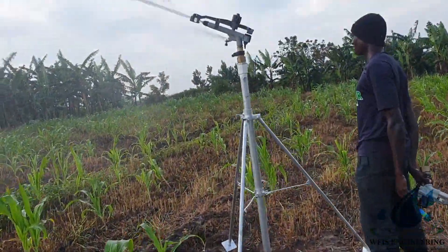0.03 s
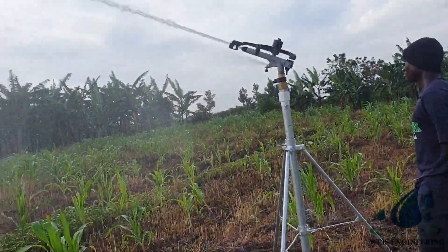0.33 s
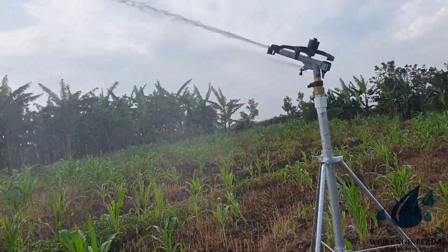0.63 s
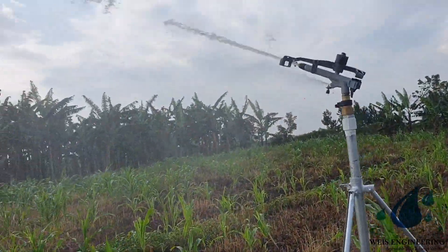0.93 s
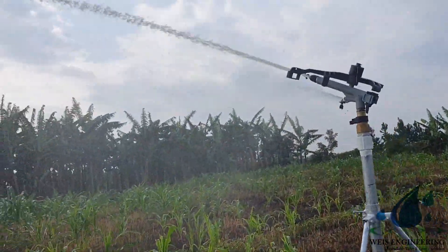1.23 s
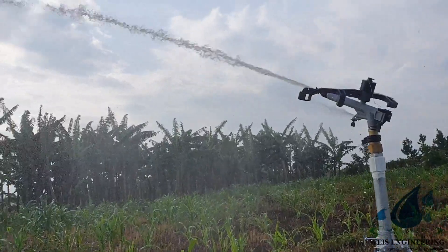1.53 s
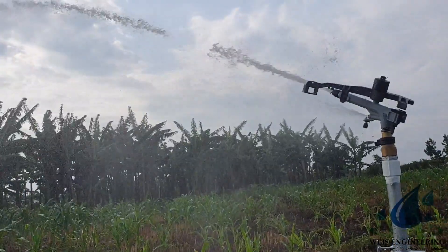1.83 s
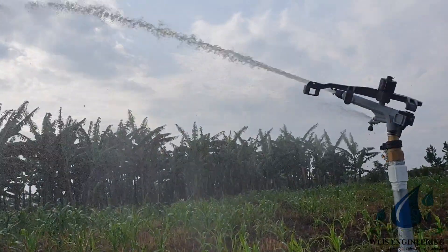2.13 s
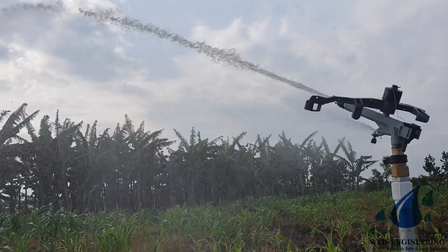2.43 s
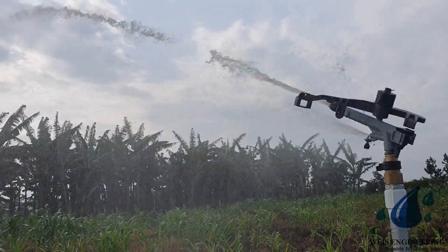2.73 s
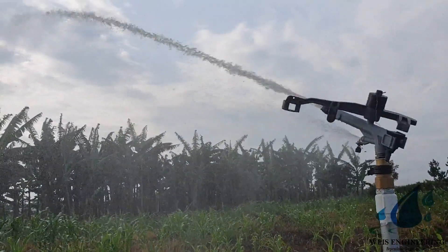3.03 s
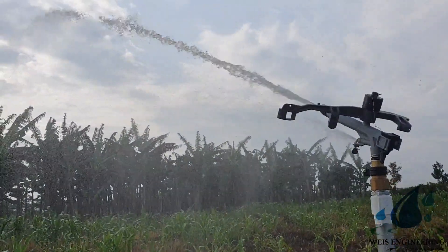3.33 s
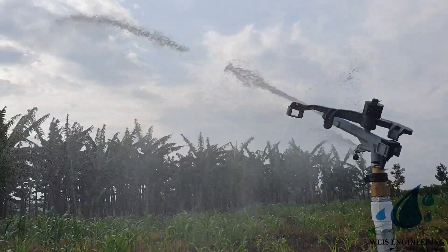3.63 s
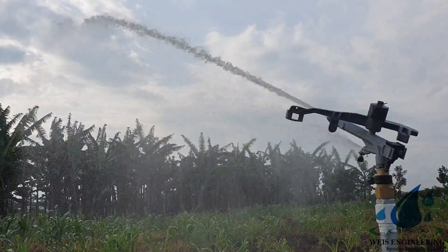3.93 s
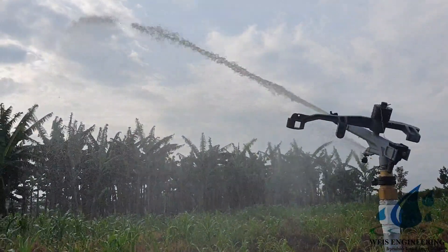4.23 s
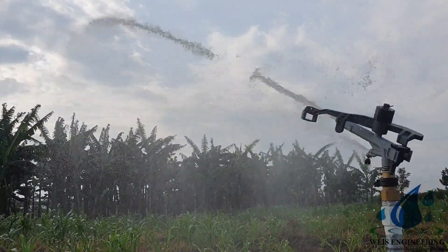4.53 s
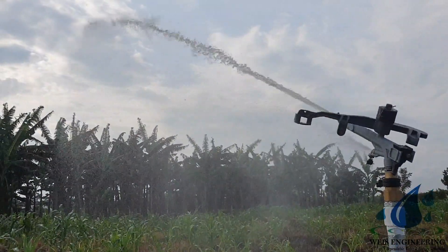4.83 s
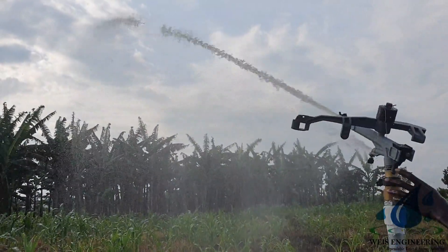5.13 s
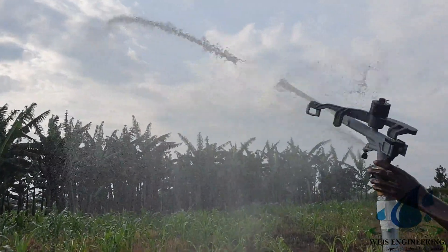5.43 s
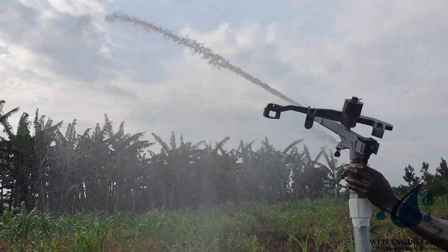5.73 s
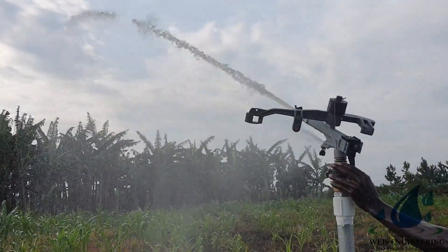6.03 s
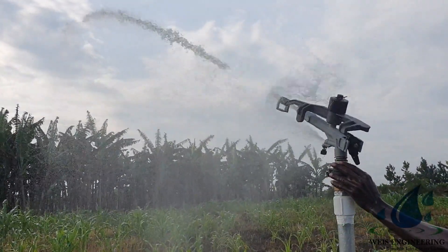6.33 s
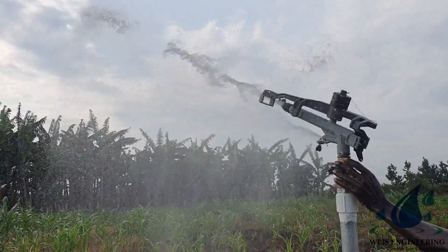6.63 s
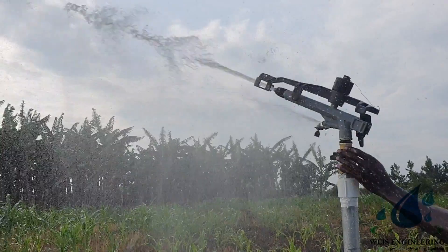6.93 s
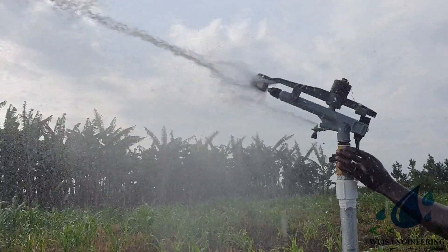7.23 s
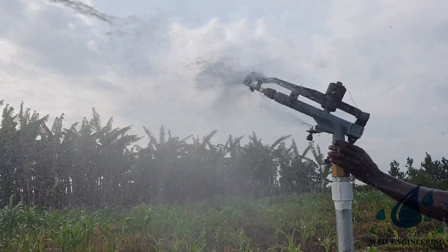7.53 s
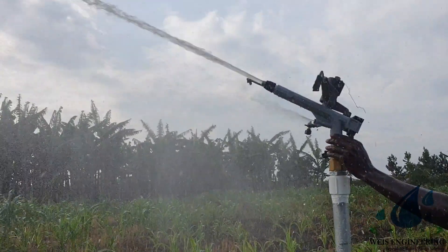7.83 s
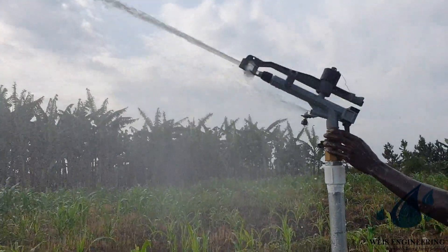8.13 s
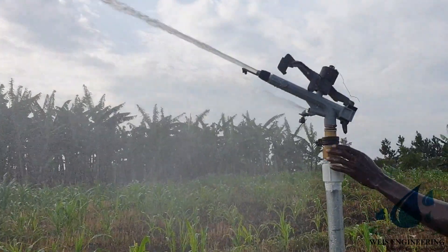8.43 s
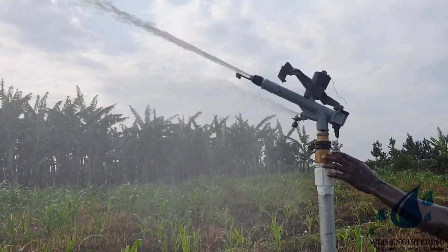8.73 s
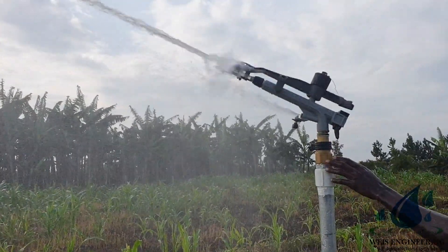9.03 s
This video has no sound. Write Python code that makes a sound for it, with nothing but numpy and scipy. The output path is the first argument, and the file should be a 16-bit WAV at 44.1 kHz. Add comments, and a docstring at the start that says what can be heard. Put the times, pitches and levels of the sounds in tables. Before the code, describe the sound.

An impact sprinkler hisses and splashes rhythmically outdoors, then breaks into rapid clacking strokes as drops tap near the microphone.

```python
"""An impact sprinkler waters a field: its jet hisses, and about twice a second the spoon of the
swinging arm cuts the water with a short splash. For about a second the head swings back in rapid
strokes; each blow on the stop excites the arm's damped modes, and flung drops tap on a hand-held
camera nearby. Eddies of a light wind flutter at the microphone ports, buffets or a knock give dull
low thumps, and the holder's fingers rub on the case and creak by stick-slip friction."""
import sys
import numpy as np
from scipy import signal
from scipy.fft import rfft, irfft
from scipy.io import wavfile

SR = 44100
rng = np.random.default_rng(int(sys.argv[2]) if len(sys.argv) > 2 else 0)


def persist_wave(psi):
    """Save psi, clipped to +-1, as 16-bit WAV."""
    counts = np.round(np.clip(psi, -1, 1) * 32767).astype(np.int16)
    wavfile.write(sys.argv[1], SR, np.atleast_2d(counts).T)


N = 399987
TIME = np.arange(N) / SR

# Strength of the breeze. Each row: time in seconds, relative level in dB.
BREEZE_LEVELS = [(0.0, -39.5), (0.92, -40.5), (1.54, -31.5), (2.31, -40.1), (3.07, -43.5), (3.23, -35.7),
                 (4.61, -53.5), (5.07, -40.5), (6.3, -50.5), (7.38, -40.5), (8.15, -42.5), (8.3, -38),
                 (9.07, -45.5)]
# Gusts. Each row: start of the hold in seconds, hold in seconds, level in dB, left over right in dB.
GUST_EVENTS = [(1.14, 0.85, -36.5, 2), (1.499, 0.055, -30.5, -12), (1.762, 0.03, -31.5, -15),
               (3.24, 0.26, -39, -2), (5.066, 0.089, -43, -8), (7.947, 0.78, -42, -3)]
# Spectra of the wind's rumble and of its eddies. Each row: frequency in Hz, gain in dB.
RUMBLE_SPECTRUM = [(20, -43), (32, -15.5), (45, 2.5), (60, 9), (85, -3), (130, -10), (250, -19), (600, -70)]
EDDY_SPECTRUM = [(18, -51), (32, -3.5), (55, 4), (100, 4), (170, -5), (280, -14.5), (500, -35), (1200, -60)]
# Dull low thumps. Each row: start in seconds, level in dB, final pitch in Hz, left over right in dB.
LOW_THUMPS = [(0.376, -37, 49, -22), (1.181, -31.5, 93, -18.5), (3.311, -39.5, 63.6, -26),
              (5.8152, -16, 50.3, 14), (8.027, -33.5, 57, 22)]
# Shifts of the grip. Each row: centre in seconds, level in dB, half length in seconds.
GRIP_SHIFTS = [(0.167, -46, 0.01), (1.191, -42, 0.0074), (3.548, -43, 0.01), (3.723, -44, .01),
               (7.765, -34.5, 0.017), (8.344, -38, .04)]
# Finger drags. Each row: first slip in seconds, release in seconds, relative level in dB.
FINGER_DRAGS = [(2.757, 2.766, -4), (2.821, 2.839, -6)]
# Spectra of skin rubbing and scraping. Each row: frequency in Hz, gain in dB.
RUB_SPECTRUM = [(100, -13), (300, 9), (700, -5.5), (1500, -6), (5000, -45)]
SCRAPE_SPECTRUM = [(2500, 10.5), (5000, 2), (8500, -13), (10500, 4), (13000, -8), (14600, -3), (15150, 15),
                   (15900, -8)]
# Modes of the case and of the wet arm. Each row: frequency in Hz, level in dB, 60 dB decay in seconds.
CASE_MODES = [(161.2, -2.5, 0.23), (309, -2.5, 0.028), (573, -17.5, 0.11), (860, -28, 0.022),
              (1050, -35, 0.015)]
ARM_MODES = [(640, -3.5, 0.038), (810, -1, 0.021), (1054, -1, 0.027), (1600, -10, .008), (2550, -5, 0.033),
             (3580, 3.5, 0.0067), (4700, -4, 0.0041)]
# Large drops on the camera. Each row: start in seconds, level in dB, pitch in Hz.
LARGE_DROPS = [(2.1640, -2.5, 1480), (6.7199, 0.5, 1650), (6.7400, -2.5, 750), (6.7746, -11, 990),
               (6.858, -4.5, 980), (7.0122, -3, 1860), (7.0300, -8.5, 1310), (7.045, -8, 1040),
               (7.1592, -2, 1670), (7.3036, -7, 1550), (7.3951, -5.5, 1780), (7.678, -3.5, 1510),
               (7.698, -6.5, 1500), (7.9484, -10, 1250), (8.3967, -17.5, 1890)]
# Response of the ports to airborne sound. Each row: frequency in Hz, left gain in dB, right gain in dB.
PORT_RESPONSE = [(290, -4, -5.5), (670, -7, -1.5), (840, -7, -4.5), (1020, -4, -0.5), (1540, 0, -9),
                 (1920, 0, -6.5), (2530, -9, -10.5), (3410, -9, -5), (3900, -16, -6), (5880, -16, -5),
                 (7640, -28.5, -21.5), (8300, -30, -22.5), (10500, -19.5, -8), (14300, -38, -12.5),
                 (16000, -36, -17.5)]
# Likeness of noise at the two ports. Each row: frequency in Hz, correlation coefficient.
PORT_COHERENCE = [(60, 0.57), (200, 0.95), (650, 0.92), (1400, 0.39), (2800, 0.026)]
# The reversing latch trips in and out. Each row: start in seconds, relative level in dB.
LATCH_TRIPS = [(6.354, -9.5), (7.688, -4.5)]
# Strength of the jet's hiss. Each row: time in seconds, relative level in dB.
JET_LEVELS = [(0.0, -49), (2.5, -47), (3.13, -51), (5.25, -51), (5.61, -47.5), (6.34, -48), (6.52, -42.5),
              (6.8, -43), (8.01, -45.5), (9.07, -47)]
# The spoon cuts the jet. Each row: start in seconds, relative level in dB.
SPOON_DIPS = [(-.016, -19), (0.437, -20), (.882, -17.5), (1.334, -18), (1.785, -16), (2.239, -17),
              (2.686, -14.5), (3.141, -20), (3.593, -21), (4.046, -21.5), (4.496, -21), (4.956, -21.5),
              (5.408, -17), (5.861, -15.5), (6.322, -17), (6.444, -20), (6.572, -18), (6.704, -17.5),
              (6.842, -19.5), (6.974, -21), (7.112, -19.5), (7.248, -19), (7.387, -17), (7.526, -18.5),
              (7.666, -17), (8.15, -17), (8.591, -18), (9.047, -16.5)]
# Spectra of the clacks, the jet and the splashes. Each row: frequency in Hz, gain in dB.
CLACK_SPECTRUM = [(60, -25), (400, -8.5), (900, 0), (3500, 5.5), (6000, 3.5), (11000, 1), (16000, -4)]
JET_SPECTRUM = [(30, 11.5), (60, 2.5), (100, 4.5), (200, 4), (400, -1), (800, 0.5), (1600, 1), (2600, -4),
                (4200, -7), (7000, -7), (11000, -5.5), (16000, -0.5)]
SPLASH_SPECTRUM = [(40, -17.5), (130, 8.5), (430, -3.5), (620, 3), (850, 0.5), (1080, 3.5), (1500, 2),
                   (3000, 1), (6000, -0.5), (11000, 1), (16000, 4)]

RETURN_FROM_S, RETURN_TO_S = 6.3, 7.6  # the head swings back
SHOWER_FROM_S, SHOWER_TO_S = 6.55, 7.7  # flung water sweeps over the camera
DIP_S, RETURN_DIP_S = 0.022, 0.026  # the spoon's time in the jet, going forward and back
CLACK_LAG_S, CLACK_DB = 0.048, -12.5  # on the return the arm hits its stop after each dip
BOUNCE_S, BOUNCE_DB = 0.011, -7.5  # it rebounds and lands again, softer
GUST_RISE_S, GUST_FALL_S = 0.054, 0.086


def amp(db):
    """Amplitude grows tenfold for every 20 dB."""
    return 10 ** (np.asarray(db) / 20)


def unit(x):
    """Normalisation to an rms of 1."""
    return x / np.sqrt(np.mean(x ** 2) + 1e-20)


def spectrum_at(points, hz, column=1):
    """Interpolation of a spectrum on a logarithmic frequency axis."""
    table = np.array(points, float)
    return np.interp(np.log(hz + 1), np.log(table[:, 0] + 1), table[:, column])


def level_curve(rows):
    """Linear interpolation of a level at every sample."""
    table = np.array(rows, float)
    return np.interp(TIME, table[:, 0], table[:, 1])


def add(mix, s, sound):
    """Superposition: a sound joins the mix at s seconds."""
    part = mix[..., max(round(s * SR), 0):][..., :sound.shape[-1]]
    part += sound[..., :part.shape[-1]]


def sides(balance_db):
    """A level difference places a sound: left and right gains."""
    return amp(np.vstack([balance_db / 2, -balance_db / 2]))


def colour(x, points, column=1, size=4096):
    """Minimum-phase filtering: the phase is the Hilbert transform of the log gain."""
    log_gain = np.log(amp(spectrum_at(points, abs(np.fft.fftfreq(size, 1 / SR)), column)))
    taps = np.fft.ifft(np.exp(np.conj(signal.hilbert(log_gain)))).real
    return signal.oaconvolve(np.atleast_2d(x), taps[None], axes=1)[:, :N]


def split(x, edge_hz):
    """Complementary filters give the parts below and above a frequency."""
    hz = np.fft.rfftfreq(N, 1 / SR)
    low = irfft(rfft(x) / (1 + (hz / edge_hz) ** 4), N)
    return low, x - low


def wander(rate_hz):
    """Low-passed noise fluctuates smoothly, with an rms of 1."""
    slow, _ = split(rng.standard_normal(N), rate_hz)
    return unit(slow)


def port_noise():
    """Partial coherence: noise at two ports is alike in the bass, unrelated in the treble."""
    shared, separate = rfft(rng.standard_normal((2, N)))
    likeness = spectrum_at(PORT_COHERENCE, np.fft.rfftfreq(N, 1 / SR))
    return irfft(np.array([shared, likeness * shared + np.sqrt(1 - likeness ** 2) * separate]), N)


def returning(s):
    """True while the head swings back."""
    return RETURN_FROM_S < s < RETURN_TO_S


def wind(rumble_db=-3.5, calm_db=-12, lumps_db=3, puffs_db=3.6):
    """Turbulent pressure rumbles and flutters at the ports; breeze and gusts add in power."""
    breeze_db = level_curve(BREEZE_LEVELS)
    rumble = unit(colour(port_noise(), RUMBLE_SPECTRUM)) * amp(breeze_db + rumble_db)
    power = amp(breeze_db + calm_db) ** 2
    for s, hold, db, balance_db in GUST_EVENTS:
        before, after = np.maximum(s - TIME, 0), np.maximum(TIME - s - hold, 0)
        swell = np.exp(-before / GUST_RISE_S - after / GUST_FALL_S)
        power = power + (amp(db) * swell * sides(balance_db)) ** 2
    eddies = rng.standard_normal((2, N))
    eddies *= amp(puffs_db * wander(11.3) + lumps_db * np.array([wander(29), wander(25)]))
    return rumble + unit(colour(eddies, EDDY_SPECTRUM)) * np.sqrt(power)


def thumps(t60=0.11, sag=3.63, sag_s=0.00425):
    """Damped oscillations of falling pitch, from wind buffeting the ports or a knock on the camera."""
    t, out = np.arange(SR // 5) / SR, np.zeros((2, N))
    for s, db, hz, balance_db in LOW_THUMPS:
        turns = np.cumsum(hz * (1 + sag * np.exp(-t / sag_s))) / SR
        add(out, s, sides(balance_db) * amp(db - 60 * t / t60) * np.sin(2 * np.pi * turns))
    return out


def rubs(balance_db=6, catch_db=3):
    """Sliding friction near the left port makes uneven noise that follows the hand's pressure."""
    pressure = sum(amp(db) * np.exp(-((TIME - s) / length) ** 2) for s, db, length in GRIP_SHIFTS)
    friction = rng.standard_normal((2, N)) * amp(catch_db * wander(110))
    return unit(colour(friction, RUB_SPECTRUM)) * pressure * sides(balance_db)


def tap(hz, crest=0.33, push_db=-11, push_ratio=0.42, push_crest=0.28,
        tick_db=-26, tick_turns=0.04, recoil_hz=230):
    """An impact transient of peak 1: a tick, a brief wave and a slower push; the wall springs back."""
    def pulse(cycles, top):
        return cycles / top * np.exp(1 - cycles / top)

    turns = hz * np.arange(SR // 40) / SR
    push_turns = turns * push_ratio
    wave = pulse(turns, crest) * np.sin(2 * np.pi * turns)
    push = amp(push_db) * pulse(push_turns, push_crest) * np.sin(2 * np.pi * push_turns)
    tick = amp(tick_db) * pulse(turns, tick_turns)
    impact = signal.lfilter(*signal.butter(2, recoil_hz, "highpass", fs=SR), wave + push + tick)
    return impact / abs(impact).max()


def creaks(slip_hz=232, slip_db=-4, growth_db=4.5, held_t60=0.026,
           snap_db=-5, snap_hz=900, scrape_db=-23, balance_db=17):
    """Stick-slip: skin jerks ever harder on the case it damps; on release the modes ring freely."""
    t, out, scrape = np.arange(SR // 3) / SR, np.zeros(N), np.zeros(N)
    ring = -sum(amp(db - 60 * t / t60) * np.sin(2 * np.pi * hz * t) for hz, db, t60 in CASE_MODES)
    damping = amp(-60 * t / held_t60)
    slip = ring * damping
    add(slip, 0, -amp(snap_db) * tap(snap_hz))
    for start, release, db in FINGER_DRAGS:
        for s in np.arange(start, release, 1 / slip_hz):
            force = amp(db + slip_db - growth_db * (release - s) * slip_hz)
            add(out, s, force * slip)
            add(scrape, s, force * damping)
        add(out, release, amp(db) * ring)
    out += amp(scrape_db) * colour(scrape * rng.standard_normal(N), SCRAPE_SPECTRUM)[0]
    return np.array([out, amp(-balance_db) * out])


def drops(right_db=-12, right_crest=0.3, flung_db=-20, flung_count=3, flight_s=0.061, scatter_s=0.016,
          shower_db=-30, shower_per_s=60, stray_per_s=1.5, stray_db=-39, pitch_hz=1450, spread_db=3):
    """Drop impacts near the left port: large ones, flung clusters, a random shower and stray mist."""
    out = np.zeros((2, N))
    for s, db, hz in LARGE_DROPS:
        right = amp(right_db) * tap(hz, crest=right_crest, tick_db=-40)
        add(out, s, amp(db) * np.array([tap(hz), right]))
    strokes = [s for s, _ in SPOON_DIPS if SHOWER_FROM_S < s < SHOWER_TO_S and returning(s)]
    flung = np.repeat(strokes, flung_count) + flight_s
    flung += scatter_s * rng.standard_normal(len(flung))
    showering = (TIME > SHOWER_FROM_S) & (TIME < SHOWER_TO_S)
    shower = TIME[(rng.random(N) < shower_per_s / SR) & showering]
    strays = TIME[rng.random(N) < stray_per_s / SR]
    for times, db in [(flung, flung_db), (shower, shower_db), (strays, stray_db)]:
        for s, (size, pitch, side) in zip(times, rng.uniform(-1.1, 1, (len(times), 3))):
            add(out, s, amp(db + spread_db * size) * sides(7 + 4 * side) * tap(pitch_hz * 1.4 ** pitch))
    return out


def clacks(click_db=3, click_t60=0.0041, ring_db=-5, crack_db=-3, crack_t60=0.024,
           clatter_db=-10, clatter_t60=0.16, clatter_hz=3000):
    """Impacts of stop and latch excite the arm's water-damped modes; the loose head clatters on."""
    t, out = np.arange(SR // 4) / SR, np.zeros((2, N))
    dull = signal.butter(2, clatter_hz, fs=SR, output="sos")
    stops = [(s + CLACK_LAG_S, CLACK_DB) for s, _ in SPOON_DIPS if returning(s)]
    bounces = [(s + BOUNCE_S, db + BOUNCE_DB) for s, db in stops]
    for s, db in stops + bounces + LATCH_TRIPS:
        detunes = rng.uniform(0.92, 1.08, len(ARM_MODES))  # no two blows ring alike
        ring = sum(amp(mode_db - 60 * t / t60) * np.sin(2 * np.pi * hz * detune * t)
                   for (hz, mode_db, t60), detune in zip(ARM_MODES, detunes))
        crack = rng.standard_normal((2, len(t))) * amp(-60 * t / crack_t60)
        body = signal.fftconvolve(crack, ring[None] / np.linalg.norm(ring), axes=1)[:, :len(t)]
        clatter = signal.sosfilt(dull, rng.standard_normal((2, len(t))))
        clatter *= amp(clatter_db - 60 * t / clatter_t60)
        click = rng.standard_normal((2, len(t))) * amp(click_db - 60 * t / click_t60)
        add(out, s, amp(db) * (click + amp(crack_db) * crack + amp(ring_db) * body + clatter))
    return colour(out, CLACK_SPECTRUM)


def jet(rush_db=15.5, fizz_db=0.1, churn_db=0.55, flutter_db=0.7, grain_db=2.4, fizz_hz=3500):
    """Jet break-up makes broadband noise: water rushes out and tears into fizzing droplets."""
    rush, fizz = split(port_noise(), fizz_hz)
    fizz *= amp(fizz_db + flutter_db * wander(45) + grain_db * wander(1200))
    strength = amp(level_curve(JET_LEVELS) + rush_db + churn_db * wander(40))
    return colour((rush + fizz) * strength, JET_SPECTRUM)


def splash_envelope(lag_s, rise_s=0.0028, fall_s=0.0037, gap_depth=0.4, gap_at=0.408,
                    mist_db=-15, mist_t60=0.26):
    """Incoherent sounds add in power: the spoon's lip, then its vane, cut the jet; the mist dies out."""
    power = np.zeros(N)
    elapsed = np.arange(SR // 3) / SR
    for s, db in SPOON_DIPS:
        length = RETURN_DIP_S if returning(s) else DIP_S
        start = max(s - 0.02, 0)  # room for the rise
        t = start + elapsed - s - lag_s
        in_jet = (1 + np.tanh(t / rise_s / 2)) * (1 - np.tanh((t - length) / fall_s / 2)) / 4
        gap = 1 - gap_depth * np.exp(-((t - gap_at * length) / 0.0013) ** 2)  # between lip and vane
        mist = (t > length) * amp(mist_db - 60 * np.maximum(t - length, 0) / mist_t60)
        add(power, start, amp(db) ** 2 * ((in_jet * gap) ** 2 + mist ** 2))
    return np.sqrt(power)


def splashes(lumps_db=2.5, grain_db=1, slap_lag_s=-0.0016, fizz_lag_s=0.0013, fizz_hz=2500):
    """Atomisation by impact: solid water slaps the spoon first, and the fine spray follows."""
    slap, fizz = split(port_noise(), fizz_hz)
    slap *= splash_envelope(slap_lag_s)
    fizz *= splash_envelope(fizz_lag_s) * amp(grain_db * wander(2000))
    return colour((slap + fizz) * amp(lumps_db * wander(380)), SPLASH_SPECTRUM)


def scene(stiff_hz=110):
    """Airborne sound is coloured by the ports; structure-borne sound loses bass in the stiff case."""
    left, right = jet() + splashes() + clacks()
    left = np.roll(left, 4)  # the sound reaches the right port first
    airborne = np.vstack([colour(left, PORT_RESPONSE, column=1), colour(right, PORT_RESPONSE, column=2)])
    stiff_case = signal.butter(2, stiff_hz, "highpass", fs=SR, output="sos")
    touches = signal.sosfilt(stiff_case, drops() + creaks() + rubs())
    return airborne + touches + wind() + thumps()


def record(dry, low_cut_hz=31, high_cut_hz=16000):
    """Finite bandwidth and headroom: a low cut, clipping at full scale, then a high cut."""
    cut = signal.sosfilt(signal.butter(3, low_cut_hz, "highpass", fs=SR, output="sos"), dry)
    taps = signal.firwin(401, high_cut_hz, window=("kaiser", 9), fs=SR)
    return signal.oaconvolve(np.clip(cut, -1, 1), taps[None], "same", axes=1)


dry = scene()
out = record(dry)
persist_wave(out)
```